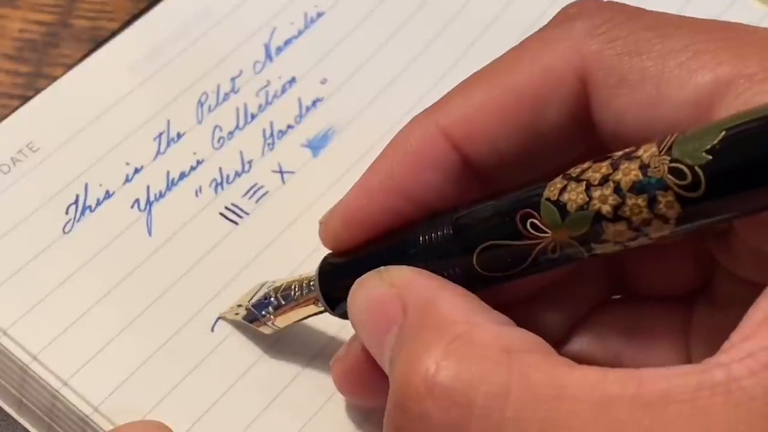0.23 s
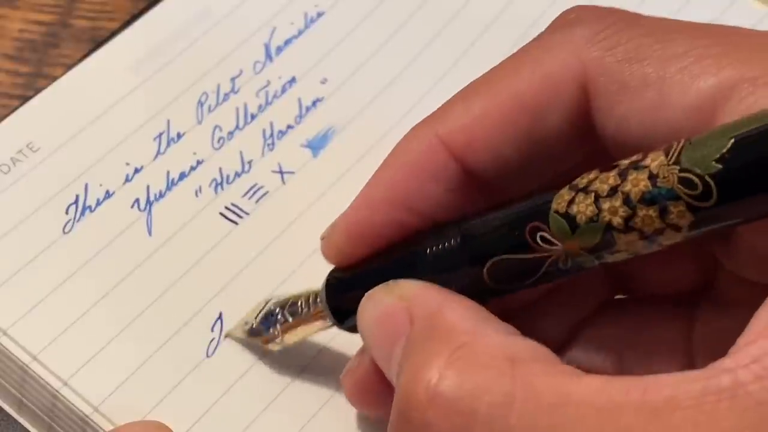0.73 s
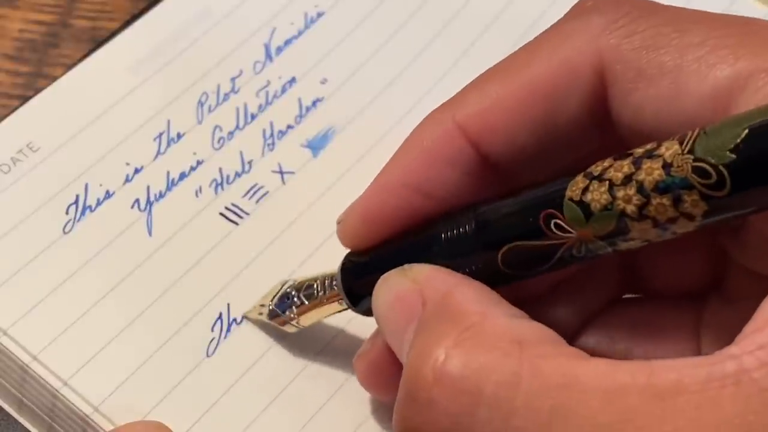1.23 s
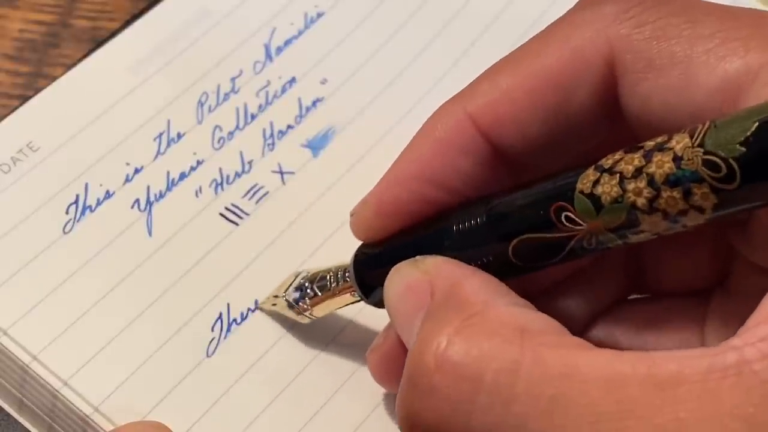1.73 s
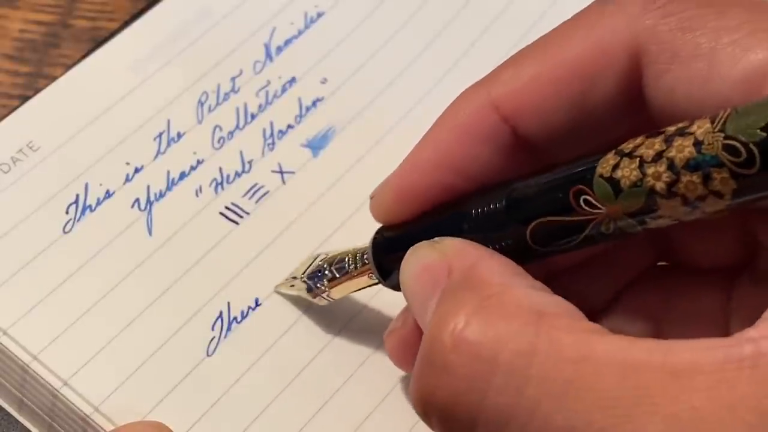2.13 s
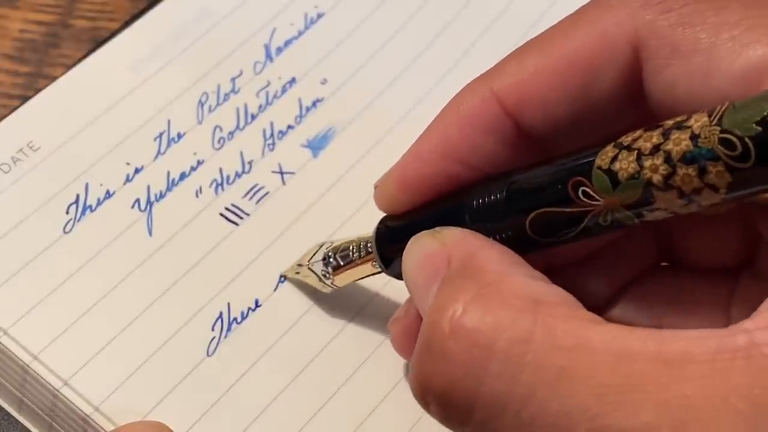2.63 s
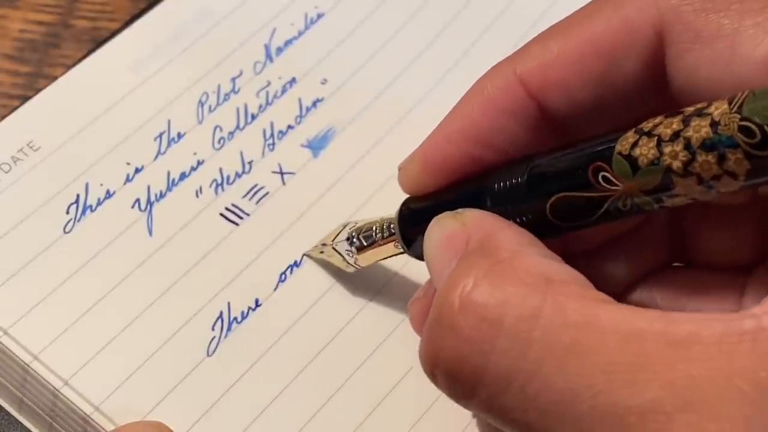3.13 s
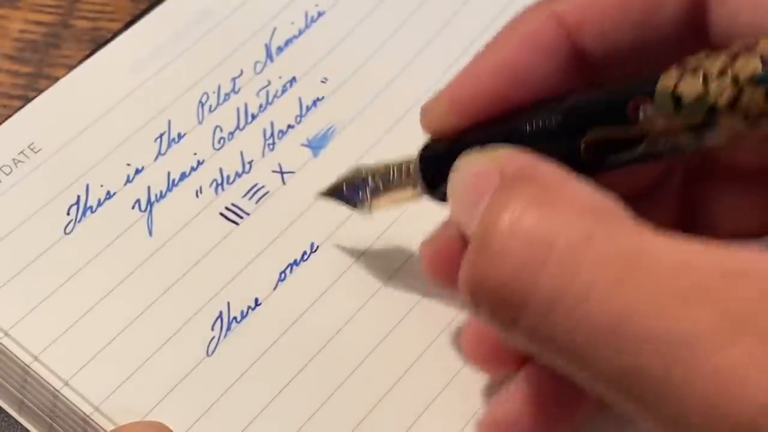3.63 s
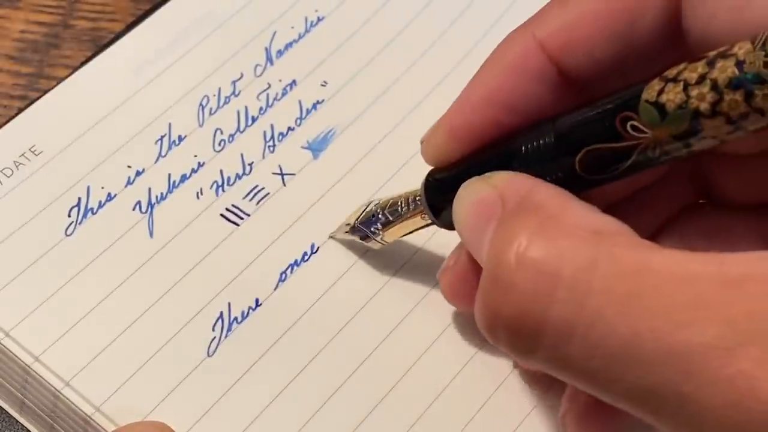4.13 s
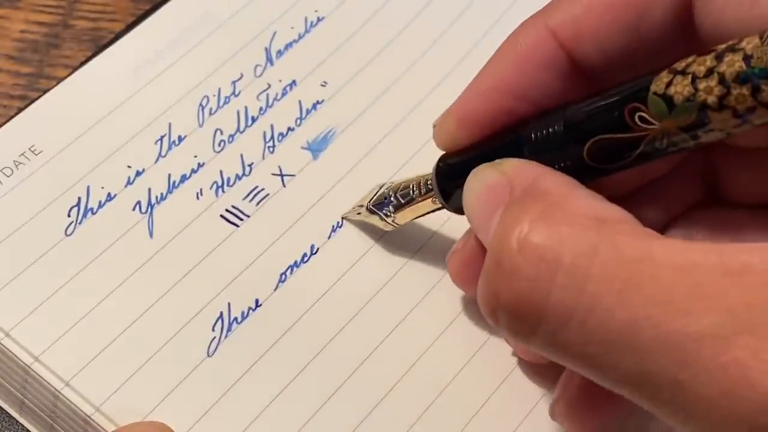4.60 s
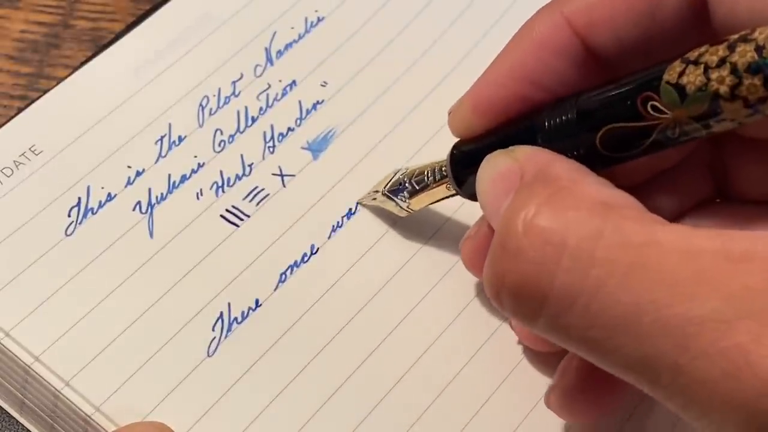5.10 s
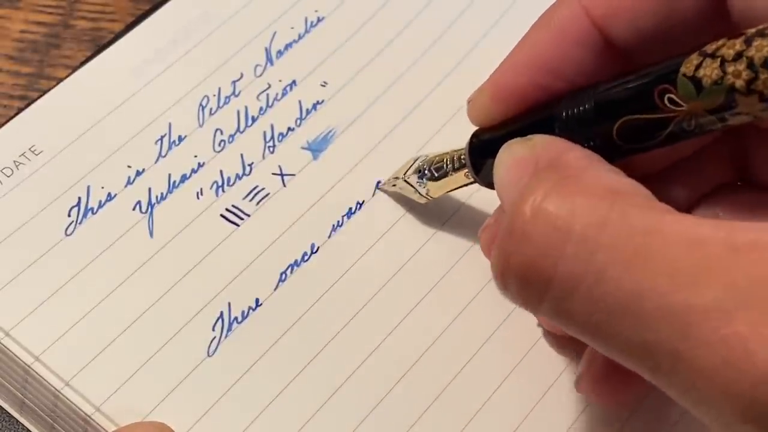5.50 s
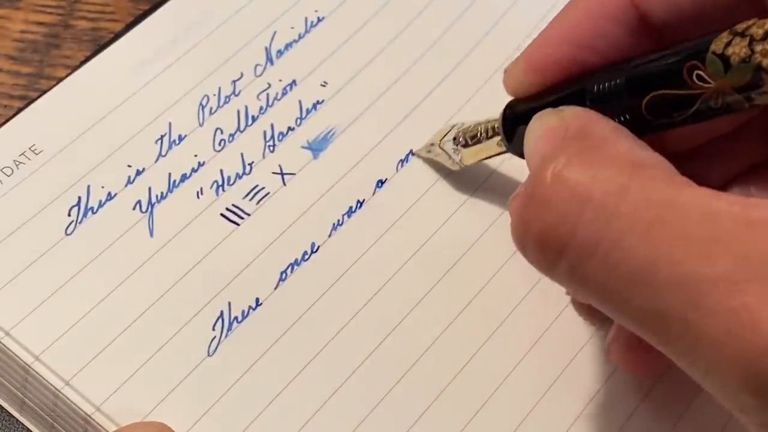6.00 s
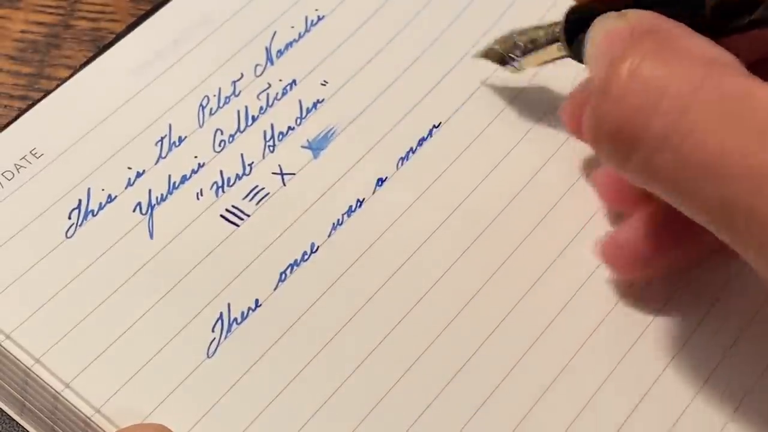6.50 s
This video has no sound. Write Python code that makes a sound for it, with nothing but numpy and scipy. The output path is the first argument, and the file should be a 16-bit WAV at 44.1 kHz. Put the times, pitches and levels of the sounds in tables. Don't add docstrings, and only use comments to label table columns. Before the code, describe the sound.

A close, very quiet indoor sound with little reverberation. A steady low hum, like a fridge, sits over soft rumble and faint hiss. From 0.1 s a fountain pen nib makes short, grainy scratches on notebook paper, each with a muted low thrum from the pad and a faint thin metallic shimmer. Strokes cluster at 0.4 to 1.1 s, with a small tap near 0.4 s, then become lighter and sparser, with a soft hand slide around 1.8 s and a barely audible distant falling squeak at 2 s. Writing resumes from 2.3 s; at 3.65 s a firmer hand slide and a tap come, then more strokes from 4.2 to 5.1 s. At 5.17 s everything dips briefly to silence and returns at double speed, an octave higher: rapid brighter scratches, a knock at 5.4 s, a brushing flick at 6.5 s, and heavier, rough strokes with a tap at 6.67 s.

```python
import sys
import numpy as np
from scipy import signal
from scipy.fft import rfft, irfft, next_fast_len
from scipy.io import wavfile
from scipy.ndimage import uniform_filter1d

SR = 44100
rng = np.random.default_rng(int(sys.argv[2]) if len(sys.argv) > 2 else 0)


def voltage_ratio(level):
    return 10 ** (np.asarray(level, float) / 20)


def master(y):
    cut = np.clip(np.atleast_2d(y).T, -1, 1)
    pcm = np.round(cut * 32767)
    wavfile.write(sys.argv[1], SR, pcm.astype(np.int16))


N = 297675

CUT_S, SPEED = 5.173, 2
CUT = round(CUT_S * SR)
M = CUT + SPEED * (N - CUT)
HEARD_S = np.interp(np.arange(M), [0, CUT, M], [0, CUT / SR, N / SR])
# share of its length at which it peaks, dB at its start, dB at its end.
PEN_SWELL, WORD_SWELL = (0.4, -8.5, -10.5), (0.27, -2, -4.5)
HAND_SWELL, FLICK_SWELL = (0.45, -12, -13), (0.46, -10.5, -14.5)


def evened(x):
    return x / np.sqrt(np.mean(x ** 2) + 1e-20)


def colour(x, points):
    size = next_fast_len(len(x))
    hz, db = np.transpose(points)
    log_hz = np.log(np.fft.rfftfreq(size, 1 / SR) + 1)
    gain = voltage_ratio(np.interp(log_hz, np.log(hz), db))
    return evened(irfft(rfft(x, size) * gain, size)[:len(x)])


def resonate(x, hz, width):
    turn = np.exp(2j * np.pi * np.cumsum(hz * np.ones(len(x))) / SR)
    r = np.exp(-np.pi * width / SR)
    smooth = signal.lfilter([1 - r], [1, -r], x / turn)
    return 2 * (turn * smooth).real


def modes(x, table):
    ringing = 0
    for hz, width, db in table:
        peak = signal.tf2sos(*signal.iirpeak(hz, hz / width, SR))
        ringing = ringing + voltage_ratio(db) * signal.sosfilt(np.vstack([peak, peak]), x)
    return evened(ringing)


def strokes(rows, columns, swell):
    gain = np.zeros(M)
    top, start_db, end_db = swell
    edge_s = 0.004
    for row in np.array(rows):
        start, length = row[0], row[1]
        a, b = np.searchsorted(HEARD_S, [start - edge_s, start + length + edge_s])
        along = (HEARD_S[a:b] - start) / length
        corners = voltage_ratio(np.array([start_db, 0, end_db]) / 2)
        size = np.interp(along, [0, np.clip(top, 0.05, 0.95), 1], corners) ** 2
        margin = edge_s / length
        ends = np.clip(np.minimum(along + margin, 1 + margin - along) / 0.15, 0, 1)
        gain[a:b] = np.maximum(gain[a:b], voltage_ratio(row[columns].sum()) * size * ends)
    return gain


def fibres(per_s, spread_db, clump_db):
    hit, size, sign, slow = rng.random((M, 4)).T
    sizes = voltage_ratio(spread_db * np.minimum(-np.log(1 - size), 3))
    clicks = (hit < per_s / SR) * sizes * np.sign(sign - 0.5)
    clumps = voltage_ratio(clump_db * evened(uniform_filter1d(slow - 0.5, size=400)))
    return evened(clicks * clumps)


def air():
    # pitch in Hz, level in dB per Hz.
    air_spectrum = [(15, -2), (30, -7), (52, -3.5), (70, -15), (95, -14), (120, -6), (150, -25), (200, -26),
                    (238, -15.5), (290, -27.5), (480, -32.5), (700, -39.5), (2500, -46.5), (15700, -53)]
    return voltage_ratio(-56) * colour(rng.standard_normal(M), air_spectrum)


def fridge():
    tone_hz = [119.97, 239.94, 236.45, 59.11, 177.3, 295.5, 354.7, 472.9, 42.8, 55.0, 88.0]
    tone_db = [0, -26, -23, -15, -30, -35, -40, -33.5, -12.5, -18, -27]
    # time in seconds, level in dB rms.
    buzz = [(0.1, -50), (0.18, -48), (0.59, -50), (0.84, -49), (1.19, -50), (3.44, -49.5), (3.75, -51),
            (4.12, -48.5), (4.46, -50), (5.1, -49.5), (5.25, -50.5), (5.286, -49.5), (6.008, -49.5),
            (6.7, -49)]
    t = np.arange(M) / SR - 0.27
    phase = rng.random(len(tone_hz))
    phase[2] = phase[1]
    tones = 0
    for hz, db, turn in zip(tone_hz, tone_db, phase):
        tones = tones + voltage_ratio(db) * np.sin(2 * np.pi * (hz * t + turn))
    return np.sqrt(2) * voltage_ratio(np.interp(HEARD_S, *np.transpose(buzz))) * tones


def squeak():
    # time in seconds, pitch in Hz, level in dB.
    whistle = [
        (1.955, 4660, -97),
        (2.0, 4530, -91),
        (2.06, 4385, -88),
        (2.085, 4350, -95),
    ]
    s, hz, db = np.transpose(whistle)
    turns = np.cumsum(np.interp(HEARD_S, s, hz)) / SR
    loudness = voltage_ratio(np.interp(HEARD_S, s, db, -200, -200))
    return loudness * np.sqrt(2) * np.sin(2 * np.pi * turns)


def taps():
    # time in seconds, peak in dB, pitch as heard in Hz, crispness (level of the tick) in dB.
    knocks = [(0.378, -50, 622, -13), (0.682, -69, 627, 4), (1.349, -68, 1260, -11), (1.429, -68, 600, -6),
              (2.699, -57.5, 620, -12), (3.628, -53, 705, -12), (3.695, -46.5, 780, 2),
              (3.856, -62, 900, 3.5), (4.212, -60, 640, -13), (5.223, -72.5, 797, -5), (5.4, -46, 870, -12),
              (5.62, -65, 600, -6), (6.265, -56, 765, -4), (6.489, -51, 2060, -1), (6.666, -43, 806, -20)]
    out, t = np.zeros(M + 2000), np.arange(2000) / SR
    tick = 3 * np.sin(2 * np.pi * 1350 * t) * voltage_ratio(-60 * t / 0.0023)
    attack = np.minimum(t / 0.00032, 1)
    for s, db, hz, crisp_db in knocks:
        true_hz = hz / (SPEED if s > CUT_S else 1)
        ring = np.sin(2 * np.pi * true_hz * t) * voltage_ratio(-60 * t / 0.011)
        at = np.searchsorted(HEARD_S, s + 0.0015)
        out[at:at + 2000] += voltage_ratio(db) * (ring + voltage_ratio(crisp_db) * tick) * attack
    return out[:M]


def hand():
    # start in seconds, length in seconds, rub in dB, fizz in dB over the rub.
    slides = [
        (1.78, 0.1, -75.5, -10),
        (1.87, 0.074, -74, -11),
        (3.625, 0.15, -64.5, -9),
    ]
    slides_fast = [
        (5.23, 0.073, -73.5, -3),
        (5.633, 0.051, -66.5, -5.5),
        (6.468, 0.08, -59.5, -4),
        (6.5, 0.046, -61, -4),
        (6.66, 0.045, -73, -10),
        (6.728, .04, -76, -11),
    ]
    # pitch in Hz, level in dB per Hz.
    skin = [(530, -27), (900, -5), (1380, -12), (1630, -3), (2540, -7), (4190, -2.5), (7520, -4.5),
            (9210, -5.5), (15600, -10)]
    rub = colour(fibres(per_s=12000, spread_db=3.5, clump_db=-1), skin)
    below_top = signal.filtfilt(*signal.butter(2, 13500, fs=SR), rub)
    out = 0
    for rows, swell, split_hz, low_db in [(slides, HAND_SWELL, 8200, 6), (slides_fast, FLICK_SWELL, 5100, 5)]:
        low = signal.filtfilt(*signal.butter(2, split_hz, fs=SR), rub)
        fizz = evened(below_top - low)
        out = out + voltage_ratio(low_db) * low * strokes(rows, [2], swell)
        out = out + fizz * strokes(rows, [2, 3], swell)
    return out


def pad_thrum(catches, press):
    middle_s = press[:, 0] + press[:, 1] / 2
    true_hz = press[:, 4] / np.where(middle_s > CUT_S, SPEED, 1)
    pad_hz = np.interp(HEARD_S, np.sort(middle_s), true_hz)
    pad = evened(resonate(resonate(catches, pad_hz, width=180), pad_hz, width=340))
    return pad * strokes(press, [2], PEN_SWELL)


def page_scratch(catches, scratch):
    # pitch in Hz, width in Hz, level in dB.
    page = [(720, 540, -3), (1297, 160, 4), (1834, 290, -0.5), (2495, 220, -4.5), (2850, 550, -8.5),
            (4160, 760, -9)]
    return modes(catches, page) * scratch


def edge_ring(catches, late_strokes):
    # pitch in Hz, width in Hz, level in dB.
    edge_modes = [
        (1387, 150, 2),
        (4120, 380, -14),
    ]
    return voltage_ratio(-7.5) * modes(catches, edge_modes) * strokes(late_strokes, [2, 3], PEN_SWELL)


def tines(catches, press, scratch):
    # pitch in Hz, width in Hz, level in dB.
    nib = [(4980, 330, 0), (4480, 400, -7), (5380, 400, -10), (7000, 900, -13), (8520, 500, -14)]
    # start in seconds, length in seconds, level in dB.
    words = [(.09, 0.087, -82), (.36, 0.15, -77), (.74, .12, -79), (.9, 0.094, -84), (1.0, 0.59, -83.5),
             (1.6, .18, -87), (2.34, 0.06, -82), (2.45, .12, -85), (2.67, .06, -85), (2.76, .17, -83),
             (3.0, .25, -88), (3.3, 0.16, -84), (3.465, .06, -81), (4.15, .14, -83), (4.3, 0.17, -81.5),
             (4.46, 0.81, -83), (4.95, .15, -81.5), (5.39, 0.058, -77), (5.5, 0.13, -86), (5.77, .29, -85),
             (6.1, .35, -87), (6.662, 0.041, -79), (6.73, .06, -78)]
    grip = voltage_ratio(2.5 * evened(uniform_filter1d(rng.standard_normal(M), size=1300)))
    pace = voltage_ratio(-4) + strokes(press, [], PEN_SWELL)
    gliding = voltage_ratio(-4) * grip * pace * strokes(words, [2], WORD_SWELL)
    pressed = voltage_ratio(-13.5) * scratch
    return modes(catches, nib) * (gliding + pressed)


def pen():
    # start in seconds, length in seconds, pad thrum in dB, scratch in dB over the thrum, pad
    # pitch as heard in Hz.
    slow_strokes = [(.09, 0.075, -70.5, -6.5, 435), (.36, 0.096, -64.5, -2, 580), (.405, 0.057, -65, 0.5, 585),
                    (.468, 0.062, -64, -5.5, 458), (.74, 0.097, -61.5, -10, 487), (.785, 0.045, -65.5, -3, 510),
                    (.895, 0.077, -67.5, -3.5, 518), (.94, .045, -70, -11, 440), (1.405, 0.038, -69, -4, 460),
                    (2.352, 0.065, -65, -9.5, 416), (2.68, 0.05, -72.5, -5, 440), (2.885, .045, -71.5, -7, 446),
                    (3.345, 0.075, -64, -10, 477), (3.375, 0.051, -63, -12, 450), (3.538, .048, -68, -5.5, 474),
                    (3.615, 0.035, -66, -10, 470), (3.675, 0.12, -68.5, -7, 460), (4.215, .066, -67, -7.5, 432),
                    (4.39, .04, -70.5, -9, 474), (4.522, .065, -68.5, -9, 470), (4.66, 0.064, -71.5, -8, 464),
                    (4.785, .055, -67.5, -9.5, 430), (4.855, 0.062, -69.5, -9.5, 461),
                    (5.025, 0.064, -67.5, -9.5, 433),
                    (1.045, 0.04, -75.5, -2, 460), (1.33, 0.051, -74.5, -7, 470), (1.612, 0.056, -72, -2.5, 472),
             (1.715, 0.045, -77, -1, 473), (1.78, 0.048, -82, 8, 460), (1.885, 0.062, -81, 1, 451),
             (2.45, .042, -71.5, -7, 467), (2.51, 0.049, -69, -10, 440), (2.77, 0.036, -75, -8, 459),
             (3.06, .07, -73, -10, 452), (3.298, .04, -74, -6, 454), (3.48, .042, -72.5, -2.5, 447),
             (4.465, .045, -75, -6, 447)]
    quick = [(5.218, .032, -62.5, -15, 820), (5.26, 0.027, -76.5, 1.5, 897),
             (5.397, 0.033, -63.5, -10, 880), (5.508, 0.03, -72, -7, 938), (5.55, 0.027, -71, -17, 902),
             (5.61, 0.033, -68.5, -12, 909), (5.64, 0.044, -73, 0.5, 990), (5.773, 0.037, -69, -9, 875),
             (5.818, .027, -68, -8, 910), (5.862, .035, -66, -9.5, 910), (5.902, .025, -71, -5, 979),
             (5.953, 0.027, -66, -9.5, 878), (5.99, .024, -75, -3, 953), (6.026, 0.034, -67, -9, 820),
             (6.143, .027, -70.5, -7.5, 956), (6.192, 0.02, -72, -7, 858), (6.262, 0.028, -66.5, -7.5, 867),
             (6.306, 0.024, -68.5, -7, 959), (6.353, 0.035, -71, -7, 890), (6.422, 0.037, -74, -4.5, 888)]
    closing = [
        (6.47, 0.07, -68.5, 2, 1040),
        (6.555, 0.033, -74, -3, 937),
        (6.662, 0.051, -57, -11, 920),
        (6.69, 0.02, -57, -5, 954),
        (6.73, 0.058, -59, 4.5, 975),
    ]
    late_strokes = np.vstack([quick, closing])
    press = np.vstack([slow_strokes, late_strokes])
    press = press[np.argsort(press[:, 0], kind="stable")]
    catches = fibres(per_s=7000, spread_db=2, clump_db=1.5)
    scratch = strokes(press, [2, 3], PEN_SWELL)
    paper = pad_thrum(catches, press) + page_scratch(catches, scratch) + edge_ring(catches, late_strokes)
    return paper + tines(catches, press, scratch)


def desk(x):
    t = np.arange(5000) / SR
    tail = rng.standard_normal(5000) * voltage_ratio(-60 * t / 0.1) * (t > 0.002)
    return x + voltage_ratio(-11.5) * signal.oaconvolve(x, tail / np.linalg.norm(tail))[:M]


def scene():
    true = air() + fridge() + squeak() + desk(taps() + hand() + pen())
    fast = signal.resample_poly(true[CUT:], 1, SPEED)
    return np.concatenate([true[:CUT], fast])[None]


def roll_off(x):
    return signal.sosfilt(signal.butter(12, 15710, fs=SR, output="sos"), x)


def record(dry):
    fade_out_s, fade_in_s = 0.031, 0.036
    t = np.arange(N) / SR - CUT_S
    ramp = np.clip(np.where(t < 0, -t / fade_out_s, t / fade_in_s), 0, 1)
    fade = ramp ** 1.4
    return roll_off(dry * fade)


dry = scene()
out = record(dry)
master(out)
```